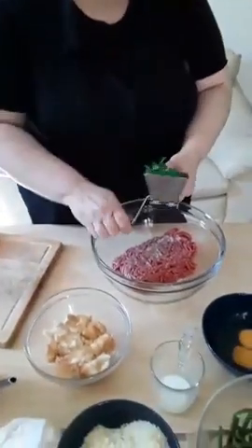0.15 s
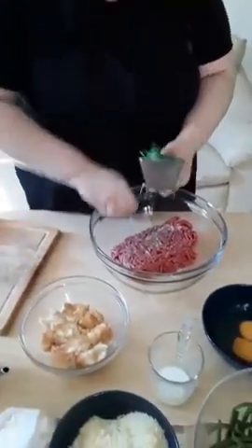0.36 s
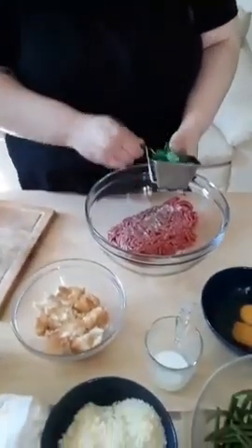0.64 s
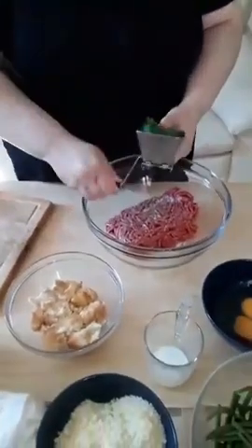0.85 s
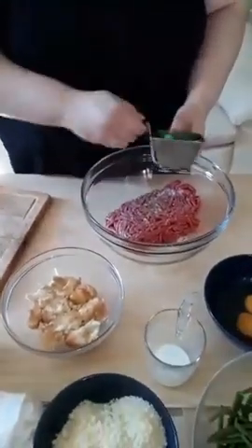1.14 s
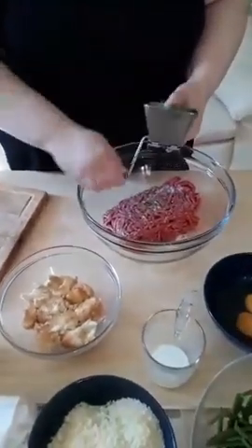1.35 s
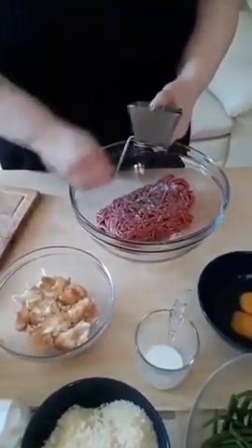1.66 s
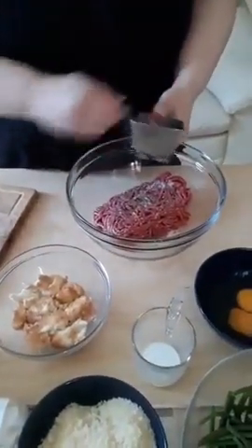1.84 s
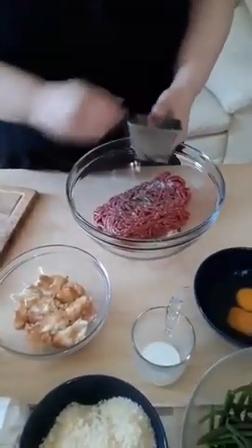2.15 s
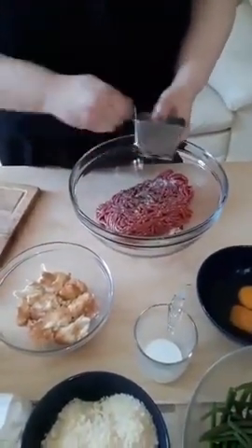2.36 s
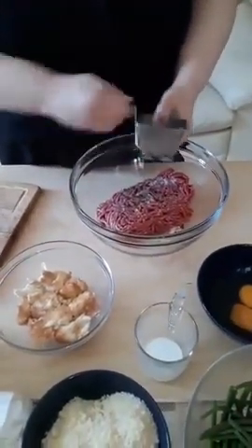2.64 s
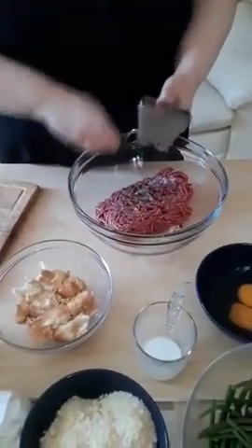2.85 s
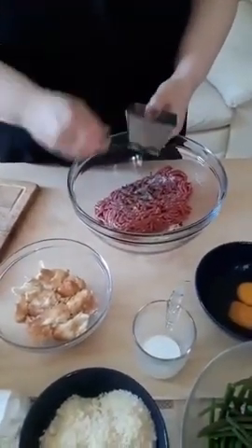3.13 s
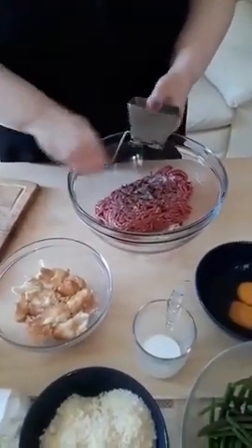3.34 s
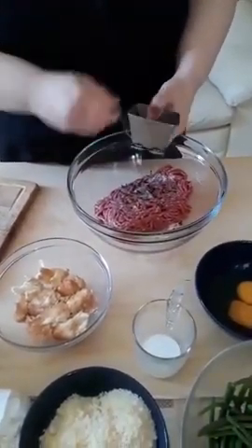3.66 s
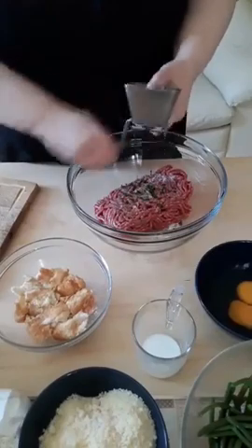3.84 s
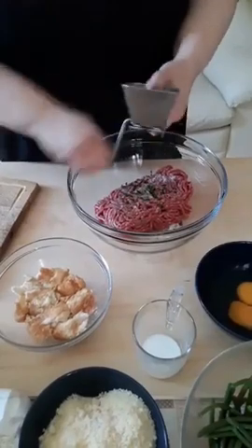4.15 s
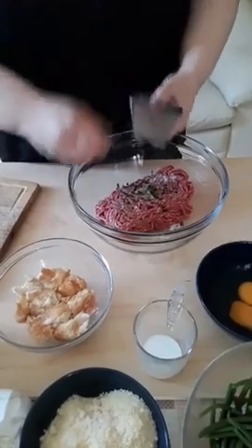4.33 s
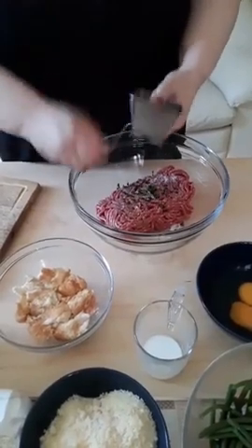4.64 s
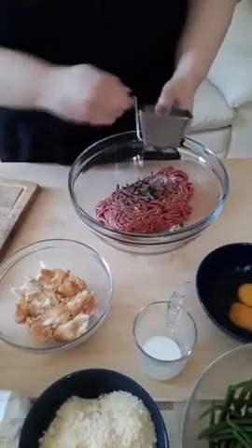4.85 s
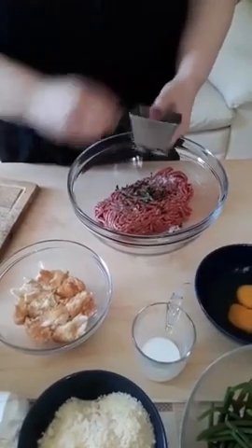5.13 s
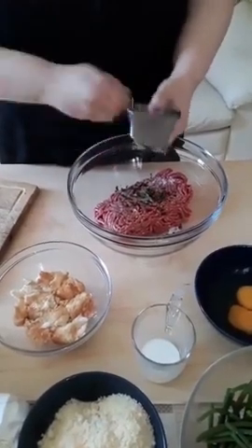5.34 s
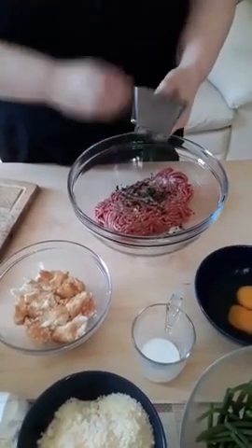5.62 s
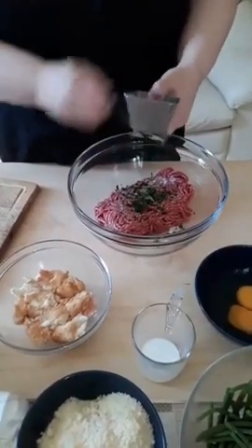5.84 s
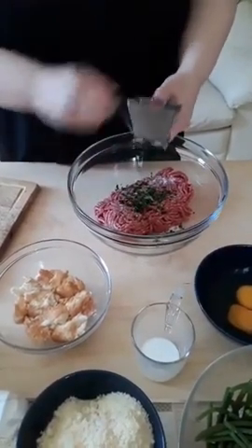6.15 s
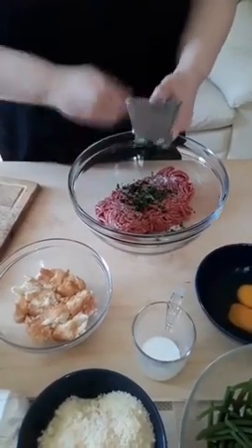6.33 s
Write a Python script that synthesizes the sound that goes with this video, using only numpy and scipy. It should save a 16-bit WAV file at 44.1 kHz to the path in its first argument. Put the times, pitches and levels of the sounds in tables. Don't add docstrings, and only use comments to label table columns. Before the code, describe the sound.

A small sheet-metal herb mill is cranked close to a bright phone microphone in a lively kitchen. At 0 s a loud gritty crunch and scrape of leaves fades fast; a tight burst of hard clacks lands around 0.4 s. From about 0.95 to 2.65 s strong knocks come in irregular pairs, roughly every third of a second, with light axle rattle and rustling scrape between. Each is a few milliseconds of rattling contact with a short bright ring, sometimes a dull thud, and a room tail of about half a second. From 2.9 to 3.9 s there is only crunching and crisp stalk snaps. Clacks return at 3.9, 4.2, 4.5, 4.8, 5.1 and 5.3 s, mixed with snaps. From 5.6 s faint ticks run quickly, then weak knocks and a last tick near 6.45 s. Soft hum, air and faint sleeve brushes stay below.

```python
import sys
import numpy as np
from scipy import signal
from scipy.fft import rfft, irfft
from scipy.io import wavfile
from scipy.ndimage import uniform_filter1d

SR = 44100
rng = np.random.default_rng(int(sys.argv[2]) if len(sys.argv) > 2 else 0)


def how_loud(loudness_db):
    steps = np.asarray(loudness_db, float) / 20
    return 10 ** steps


def pcm_store(signal):
    levels = np.round(np.clip(np.atleast_2d(signal), -1, 1) * 32767)
    wavfile.write(sys.argv[1], SR, levels.astype(np.int16).T)


N = 286164

# [t/s, scrape level/dB]
CRANK = [(0.0, -30), (0.1, -42), (0.34, -55), (0.5, -67), (0.66, -47.5), (0.79, -35), (0.9, -39.5),
         (1.3, -40.5), (1.7, -39), (2.6, -45), (2.88, -42), (3.08, -47.5), (3.3, -47), (4.95, -42),
         (5.4, -52), (5.6, -58), (6.1, -55), (6.49, -46)]
# [t/s, level/dB]
BACKGROUND_GAIN = [(0.0, -51.5), (0.3, -57.5), (0.8, -55.5), (1.4, -58), (1.95, -55.5), (2.6, -59.5),
                   (2.75, -62.5), (2.96, -68.5), (3.2, -61), (3.55, -58.5), (3.9, -61.5), (4.6, -57),
                   (5.3, -61), (6.49, -60)]
# [f/Hz, level per Hz/dB]
HUM_COLOUR = [(12, -8), (20, -9), (27, -16), (38, -46), (65, 0), (97, -7), (129, 3.5), (144, 4),
              (173, -13.5), (260, -7), (340, -16), (570, -120)]
# [f/Hz, level per Hz/dB]
AIR_COLOUR = [(100, -41), (170, -0.5), (221, -10), (377, -1), (411, -5.5), (524, -6), (1020, -8.5),
              (1600, -3), (2080, -51), (3520, -120)]
# [start t/s, end t/s, f/Hz]
TOP_TONES = [(0, .59, 13312), (0, .08, 11810), (2.12, 2.5, 12562), (2.66, 3.35, 12562), (3.92, 4.76, 13312),
             (4.95, 5.3, 13312), (6.17, 6.26, 11810), (6.29, 6.49, 13312), (6.29, 6.45, 12562),
             (6.29, 6.43, 11810), (6.29, 6.4, 11060)]
# [t/s, peak level/dB, share sent to the room/dB, contact time/ms]
CRUNCHES = [(.002, -17, 3, 12.5), (1.19, -29, -13.5, 18), (3.165, -24, -3, 53), (3.388, -20.5, 4, 26),
            (3.437, -31, -17, 15), (3.524, -21, -1.5, 23), (3.672, -24, 0, 33), (4.711, -17.5, -16, 12),
            (4.808, -14, -15, 7.7), (5.074, -16, -2.5, 11), (6.284, -25.5, -14, 15),
            (3.775, -29.5, 4.5, 47), (2.5, -21, -13, 20), (3.108, -28, 6.5, 8), (2.531, -13, -16, 2.5),
            (2.93, -25, -3, 25), (3.019, -24.5, -12, 27)]
# [t/s, peak level/dB, low modes/dB, share sent to the room/dB]
AXLE_PLAY = [(0.0359, -21, -6, 0.4), (0.219, -20, -4, -5), (0.3596, -16.5, -7, 3), (0.9365, -15, 0, 2),
             (1.1868, -15, -5, 2.5), (1.307, -22, -7, 4.5), (1.346, -16.5, -8, -7), (1.401, -18.5, 1, -23),
             (1.699, -37, 0, -2.2), (2.0062, -11.5, -9, -9), (2.3577, -16, 8.5, 2), (2.452, -22, 8.5, -5.5),
             (2.4884, -24, -2, -4), (2.5308, -20, -11, -13), (2.6242, -27, -13, 0)]
# [t/s, peak level/dB, low modes/dB, middle modes/dB, share sent to the room/dB]
CATCHES = [(0.1141, -8.5, -2, 1, -2), (0.381, -1.5, 0.5, 0.4, -6), (0.402, 0.5, -1, 0.2, -1.5),
           (0.4209, -5, 5.5, 4.5, -7), (0.539, -14, 2, 2, -11), (0.9544, -16, 0, -8, -15),
           (0.9749, -1.5, -1, 2, -4.5), (0.9877, -7.5, 10, -6, -4), (1.0453, 2, 3, 4.5, -4.5),
           (1.4391, -3, 0.5, -1.5, -5), (1.475, 0.5, -0.5, 4, -4.5), (1.7707, -3, -2.5, 0, -5),
           (1.779, -6, 10, 1.5, -13.5), (1.8003, -11, 5.5, 2.5, -3.5), (2.062, -4.5, 0, 0, -5),
           (2.108, 2.5, 1.5, 5, -4), (2.374, -7.5, 1, 6, -11), (2.6413, 4.5, 2.5, 0, -3.5)]
# [t/s, peak level/dB, low modes/dB, middle modes/dB, share sent to the room/dB]
LATE_CATCHES = [(3.9187, -4.5, 0, -4, -8), (4.2306, -1.5, -5.5, -4, -6.5), (4.256, -16.5, 9.5, 3, -18),
                (4.5033, -6.5, -1, -3.5, -6.5), (4.798, -8.5, 7, 1.5, -8), (5.1014, 0, 9, 3, -2),
                (5.338, -2.5, 3.5, -2, -9.5), (6.112, -15.5, 5.5, -5, -11), (6.1227, -25, 12.5, 9.5, -7.5),
                (6.2085, -27.5, 15.5, 9.5, -8.5), (6.2682, -12, -4, -2.5, -11), (6.3591, -27.5, 9, 3, -5)]
# [t/s, peak level/dB, share sent to the room/dB]
SNAPS = [(3.1325, -18, 7.5), (3.1434, -23, 7), (3.237, -15, 2.5), (3.3139, -20, 0.5), (3.3558, -13, -2.5),
         (3.3927, -14, 1), (3.5074, -17, 2.5), (3.553, -17, -15), (3.5862, -15.5, -7), (3.6265, -18, -4),
         (3.6488, -24.5, 6.5), (3.675, -15, -16), (3.71, -18, 2.5), (3.8334, -14.5, -3),
         (4.0083, -14, -3.5), (4.0836, -15, 2.5), (4.154, -16, -5), (4.3633, -16.5, 2.5),
         (4.4286, -15.5, -8), (4.4485, -17.5, -6), (4.569, -15, -2), (4.6538, -13, -1.5),
         (4.7546, -19, -21), (4.9447, -12.5, -4), (4.996, -15, -5.5)]
# [t/s, peak level/dB]
TICKS = [
    (5.5797, -23.5),
    (5.716, -30),
    (5.784, -25),
    (5.8437, -25.5),
    (5.877, -26),
    (5.8962, -24.5),
    (5.9375, -28),
    (6.4512, -22),
    (5.689, -31),
]
# [f/Hz, width/Hz, level/dB]
DEEP_MODES = [(657, 40, -18.5), (825, 1200, -26.5), (1202, 67, -8.5), (1516, 230, -17.5)]
LOW_MODES = [(1530, 450, -11), (1792, 142, -5), (1826, 100, -2), (2019, 109, 2.5)]
MIDDLE_MODES = [(2450, 1820, -12.5), (3004, 330, -5.5), (3690, 284, -8.5), (4310, 490, -8.5),
                (4917, 270, -14.5)]
HIGH_MODES = [(5366, 700, -10.5), (6520, 680, -4), (7450, 603, 1.5), (8230, 620, 3.5), (9140, 1280, -3.5),
              (11230, 1640, -8), (11800, 1460, -10), (13660, 430, -16), (13500, 1100, -24)]
ROOM_DB = (2, -2, -0.3, -1.65)
RADIATES_HZ = (250, 1350, 1600, 3000)
# [f/Hz, t60/s]
KITCHEN_T60 = [(500, 0.64), (1200, 0.86), (2500, 0.48), (5000, 0.58), (8000, 0.32), (13000, 0.51)]
# [t/s, length/s, level/dB, low f/Hz, high f/Hz]
BRUSHES = [
    (0.72, 0.2, -52, 456, 990),
    (2.358, 0.12, -54.5, 400, 1210),
    (3.347, 0.12, -58.5, 450, 900),
    (4.3, .45, -65, 330, 706),
]
# [t/s, thud level/dB, deep modes/dB]
JOLTS = [
    (1.046, -41, -1),
    (1.473, -35, -1.5),
    (1.803, -43, 2),
    (2.109, -46, 4.5),
    (2.375, -51, 5),
    (2.642, -36.5, 0.9),
    (5.103, -41, 2),
]

LIGHT_MS, LIGHT_DEEP_DB = 5.4, -26


def rms_one(x):
    return x / np.sqrt(np.mean(x ** 2) + 1e-20)


def energy(x):
    return np.sqrt(np.sum(x ** 2, axis=-1, keepdims=True) + 1e-20)


def in_time(rows):
    s, *columns = np.transpose(rows)
    return [np.interp(np.arange(N) / SR, s, column) for column in columns]


def at_hz(points, hz):
    point_hz, value = np.array(points).T
    return np.interp(np.log(hz + 1), np.log(point_hz), value)


def drift(rate):
    r = np.exp(-40 * np.pi * rate / SR)
    white = rng.standard_normal(N // 20 + 2002)
    slow = signal.lfilter([1], [1, -2 * r, r * r], white)[2000:]
    return np.interp(np.arange(N) / 20, np.arange(len(slow)), rms_one(slow - slow.mean()))


def pressure():
    rise_s, decay_s, drag_db = 0.12, 0.14, -26.5
    s, db, low, middle, wet = np.transpose(CATCHES + LATE_CATCHES)
    t = np.arange(SR // 2) / SR
    swell = (1 - np.exp(-(t / rise_s) ** 2)) * np.exp(-2 * t / decay_s)
    starts = np.bincount((s * SR).astype(int), how_loud(db + wet + drag_db) ** 2, N)
    drag = signal.fftconvolve(starts, swell)[:N]
    return np.sqrt(how_loud(in_time(CRANK)[0]) ** 2 + np.abs(drag))


def scraping():
    born = rng.random(N) < 2500 * how_loud(5.0 * drift(25)) / SR
    grains = born * how_loud(3.3 * np.minimum(rng.exponential(1, N), 5)) * rng.choice([-1, 1], N)
    slips = (rng.random(N) < 70 / SR) * rng.exponential(1, N)
    bunch = 1 + 0.18 * signal.fftconvolve(slips, np.hanning(180))[:N]
    friction = 0.48 * rng.standard_normal(N)
    return rms_one((rms_one(grains) + friction) * bunch) * how_loud(0.42 * drift(68))


def coloured(spectrum):
    hz = np.fft.rfftfreq(N, 1 / SR)
    return rms_one(irfft(rfft(rng.standard_normal(N)) * how_loud(at_hz(spectrum, hz)), N))


def background():
    gain_db, = in_time(BACKGROUND_GAIN)
    hum = how_loud(gain_db - 1.76 + drift(2.4) + drift(11)) * coloured(HUM_COLOUR)
    rustle = (pressure() / how_loud(-40)) ** 0.33
    air = how_loud(gain_db - 1.27 + drift(20)) * np.sqrt(0.68 + rustle ** 2) * coloured(AIR_COLOUR)
    return hum + air


def top_tones(x):
    t, out = np.arange(N) / SR, x.copy()
    for hz in {row[2] for row in TOP_TONES}:
        gate = sum(np.clip(np.minimum(t - a, b - t) / .015, 0, 1) for a, b, f in TOP_TONES if f == hz)
        band_pass = signal.butter(3, [hz - 450, hz + 120], "band", fs=SR, output="sos")
        band = signal.sosfiltfilt(band_pass, x)
        level = np.sqrt(uniform_filter1d(band ** 2, size=2000) + 1e-14)
        out += gate * (1.3 * level * np.sin(2 * np.pi * hz * t) - .75 * band)
    return out


def crunches():
    low_db, middle_db = -1, -3.5
    return [(s, db, LIGHT_DEEP_DB, low_db, middle_db, wet, ms) for s, db, wet, ms in CRUNCHES]


def axle_play():
    middle_db = 1.5
    return [(s, db, LIGHT_DEEP_DB, low, middle_db, wet, LIGHT_MS) for s, db, low, wet in AXLE_PLAY]


def deep(s, db):
    return next((deep_db for at, thud_db, deep_db in JOLTS if abs(at - s) < .008), db - 6.5)


def catches():
    return [(s, db, deep(s, db), low, middle, wet, 5.77 - 0.1447 * db)
            for s, db, low, middle, wet in CATCHES + LATE_CATCHES]


def snaps():
    low_db, middle_db = -6.5, -6
    return [(s, db, LIGHT_DEEP_DB, low_db, middle_db, wet, LIGHT_MS) for s, db, wet in SNAPS]


def ticks():
    low_db, middle_db, room_db = 1, -0.72, -4
    return [(s, db, LIGHT_DEEP_DB, low_db, middle_db, room_db, LIGHT_MS) for s, db in TICKS]


def knocks():
    return np.array(catches() + axle_play() + snaps() + ticks() + crunches()).T


def contacts(s, peak_db, ms, size=2600):
    age = np.arange(size) / SR / (np.clip(ms, 1, 38)[:, None] / 1000)
    shape = (1 - np.exp(-(age / 0.39) ** 2)) * np.exp(-age ** 3.44 * 1.03)
    slips = how_loud(5.7 * np.minimum(rng.exponential(1, age.shape), 4)) * rng.choice([-1, 1], age.shape)
    force = shape * slips / np.sqrt(np.mean(slips ** 2)) * how_loud(peak_db)[:, None]
    at = np.round((s - .0012) * SR).astype(int)[:, None] + np.arange(size)
    return np.clip(at, 0, N - 1), force


def resonate(x, hz, width_hz):
    r = np.exp(-np.pi * width_hz / SR)
    top = np.array([1, 0, -1]) * (1 - r * r) / 2
    bottom = [1, -2 * r * np.cos(2 * np.pi * hz / SR), r * r]
    return signal.lfilter(top, bottom, x + 1e-18)


def body(inputs, modes):
    rows = [how_loud(db) * resonate(x, hz, width_hz) for x, (hz, width_hz, db) in zip(inputs, modes)]
    return sum(rows[::2]) - sum(rows[1::2])


def struck_metal(at, force, strength, share, firm, modes):
    unit = signal.unit_impulse(force.shape[1])
    push = force + firm * energy(force) * np.roll(unit, 70)
    blows = body([push * column[:, None] for column in share.T], modes)
    blows *= strength * energy(body([unit] * len(modes), modes)) / energy(blows)
    return np.bincount(at.ravel(), blows.ravel(), N)


def mill():
    s, peak_db, deep_db, low_db, middle_db, wet_db, ms = knocks()
    at, force = contacts(s, peak_db, ms)
    scrape = how_loud(8) * pressure() * scraping()
    direct, sent = np.zeros(N), np.zeros(N)
    groups = zip((DEEP_MODES, LOW_MODES, MIDDLE_MODES, HIGH_MODES),
                 (deep_db, low_db, middle_db, 0 * s),
                 (-31, -3, 0.53, 0),
                 (3.1, 1.8, 1.38, 1.34),
                 (1.6, 0.81, 0.46, 0.49),
                 ROOM_DB, RADIATES_HZ)
    for modes, knock_db, rub_db, spread_db, firm, room_db, edge_hz in groups:
        share = how_loud(spread_db * rng.standard_normal((len(s), len(modes))))
        strength = energy(force) * how_loud(knock_db - 2.5)[:, None]
        struck = struck_metal(at, force, strength, share, firm, modes)
        drives = []
        for column in share.T:
            rub = scrape * how_loud(rub_db + 1.45 * spread_db * drift(16.6))
            click_size = strength[:, 0] * how_loud(wet_db + room_db) * column ** 1.3
            clicks = np.bincount(at[:, 50], click_size, N)
            drives.append(np.array([rub, clicks + how_loud(-11.0) * rub]))
        near, far = body(drives, modes)
        high_pass = signal.butter(2, edge_hz, "high", fs=SR)
        near, far = signal.lfilter(*high_pass, [near + struck, far])
        direct += near
        sent += far
    return direct, sent


def table_echo(x):
    lag = round(.0022 * SR)
    return x + how_loud(-22) * np.pad(x, (lag, 0))[:N]


def kitchen(x):
    t = np.arange(round(1.2 * SR)) / SR
    edges, tail = 300 * 2 ** np.arange(0, 5.8, .7), 0
    for low, high in zip(edges, edges[1:]):
        band_pass = signal.butter(2, [low, high], "band", fs=SR, output="sos")
        band = signal.sosfilt(band_pass, rng.standard_normal(len(t)))
        tail = tail + band * how_loud(-60 * t / at_hz(KITCHEN_T60, np.sqrt(low * high)))
    tail = tail * (1 - np.exp(-np.clip(t - .004, 0, 9) / 0.003))
    return signal.fftconvolve(x, tail / np.sqrt(np.sum(tail ** 2)))[:N]


def brush():
    out, white = 0, rng.standard_normal(N)
    for s, length, db, low_hz, high_hz in BRUSHES:
        swell = np.sin(np.pi * np.clip((np.arange(N) / SR - s) / length, 0, 1))
        band_pass = signal.butter(2, [low_hz, high_hz], "band", fs=SR, output="sos")
        out = out + how_loud(db) * swell * rms_one(signal.sosfilt(band_pass, white))
    return how_loud(2 * drift(30)) * out


def jolts():
    out, thud_hz, decay_s = np.zeros(N), 207, 0.0013
    for s, peak_db, deep_db in JOLTS:
        start = round(s * SR)
        t = np.arange(N - start)[:3000] / SR
        thud = np.sin(2 * np.pi * thud_hz * t) * np.exp(-t / decay_s) * 3.0
        out[start:][:3000] += how_loud(peak_db) * thud
    return out


def scene():
    direct, sent = mill()
    close = table_echo(direct) + jolts() + brush()
    return (close + how_loud(4.5) * kitchen(sent) + background())[None]


def top_cut(x):
    return signal.sosfilt(signal.butter(12, 15140, fs=SR, output="sos"), x)


def record(dry):
    low_pass = signal.cheby2(16, 42, 14620, fs=SR, output="sos")
    mix = top_tones(signal.sosfilt(low_pass, dry))
    return top_cut(mix)


dry = scene()
out = record(dry)
pcm_store(out)
```